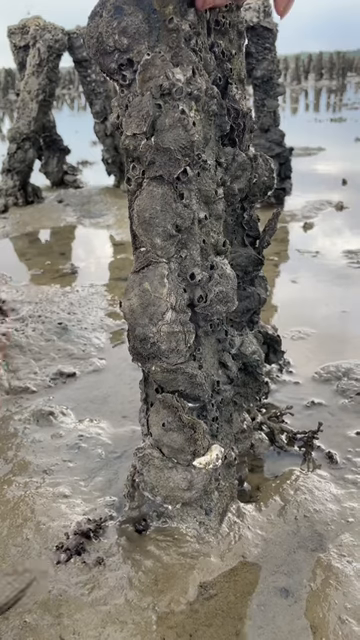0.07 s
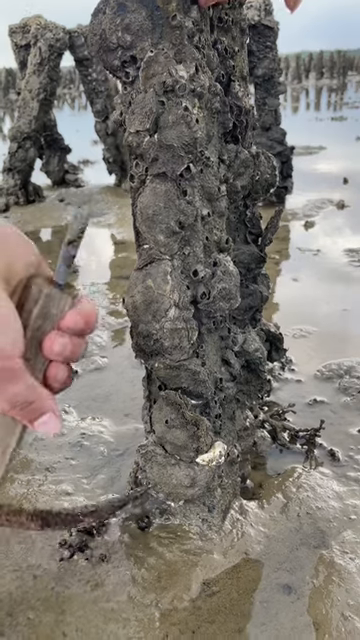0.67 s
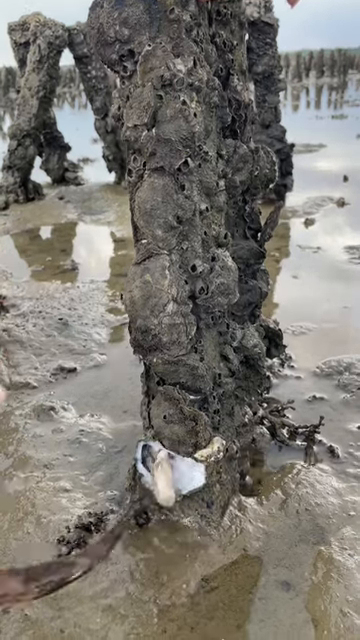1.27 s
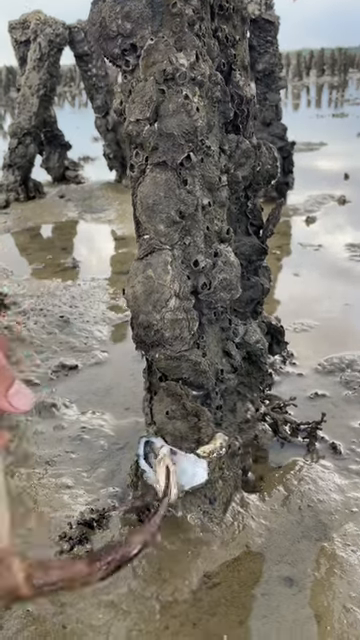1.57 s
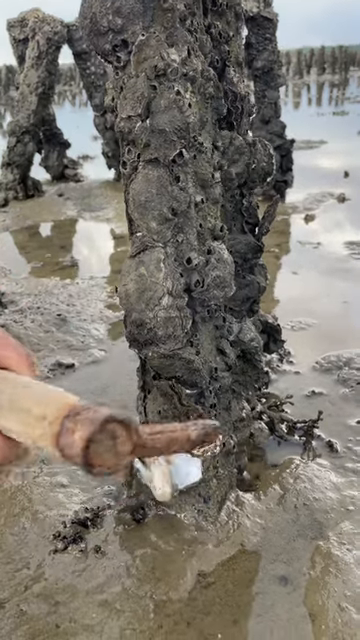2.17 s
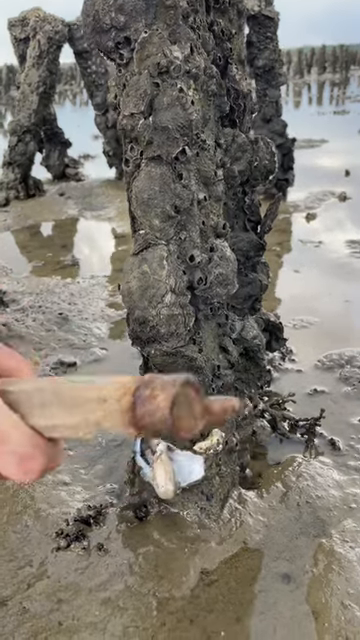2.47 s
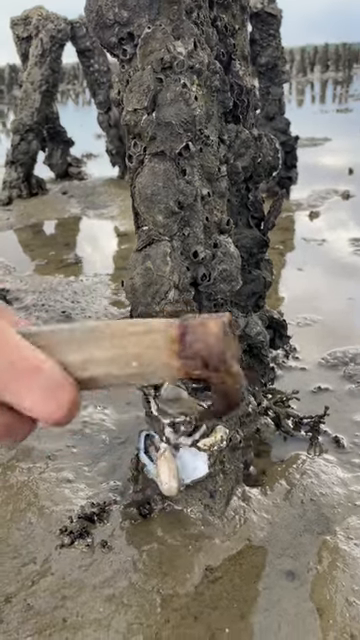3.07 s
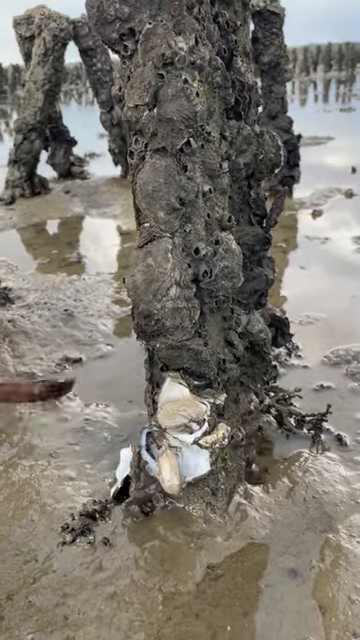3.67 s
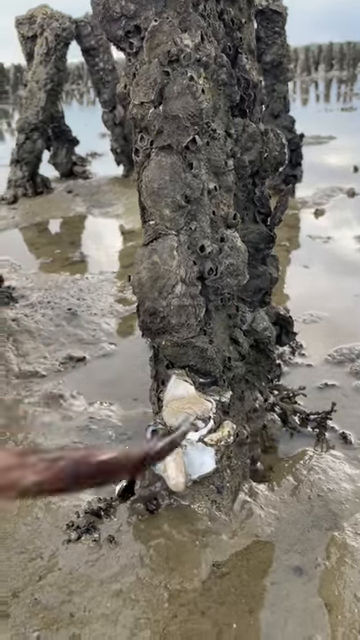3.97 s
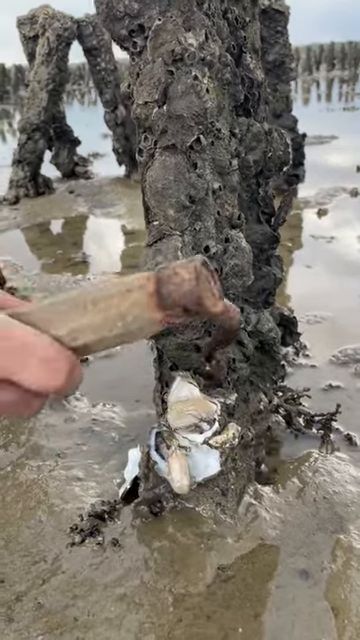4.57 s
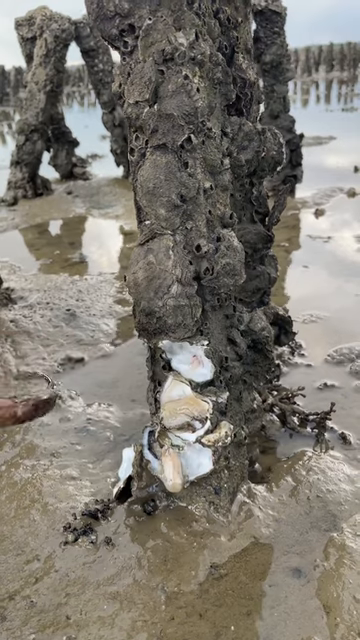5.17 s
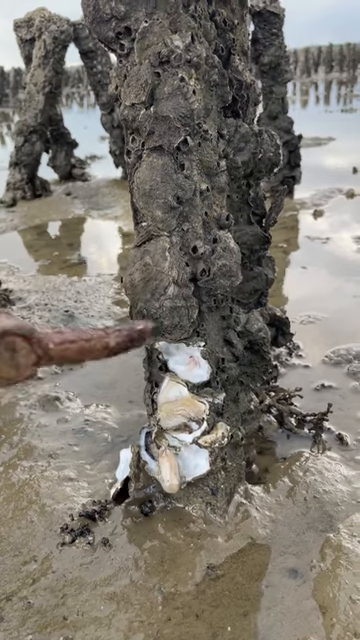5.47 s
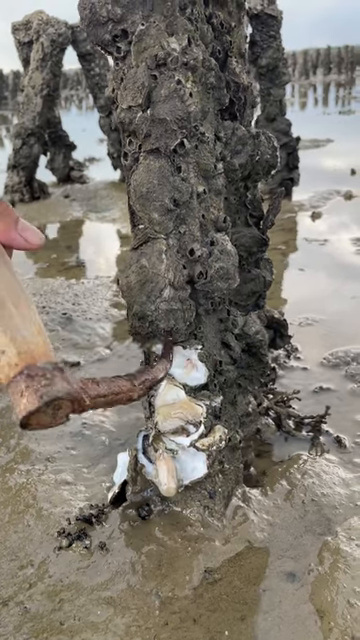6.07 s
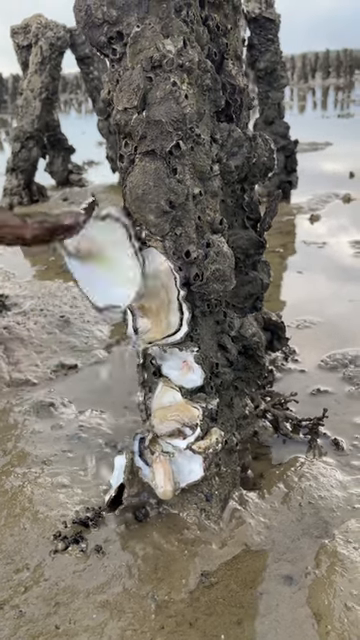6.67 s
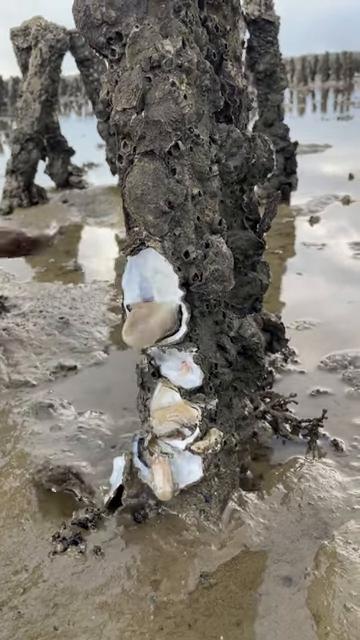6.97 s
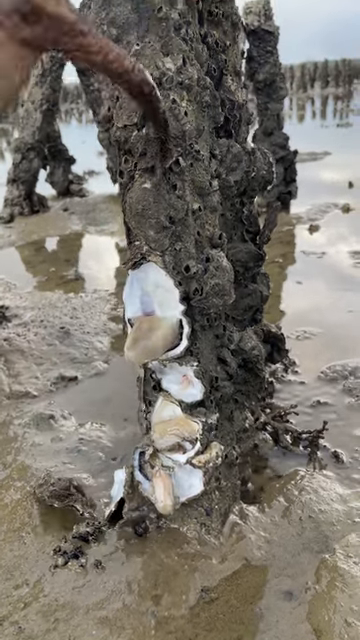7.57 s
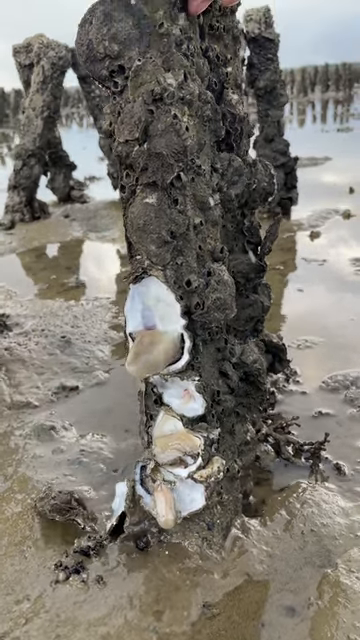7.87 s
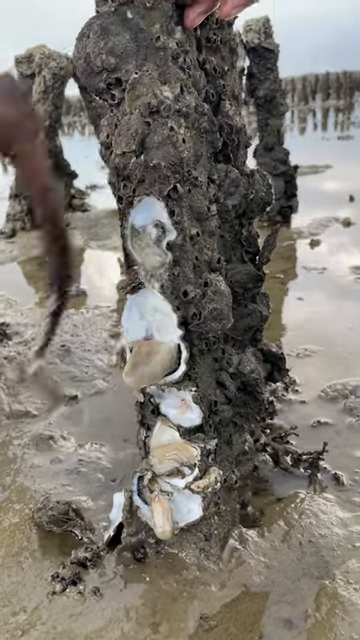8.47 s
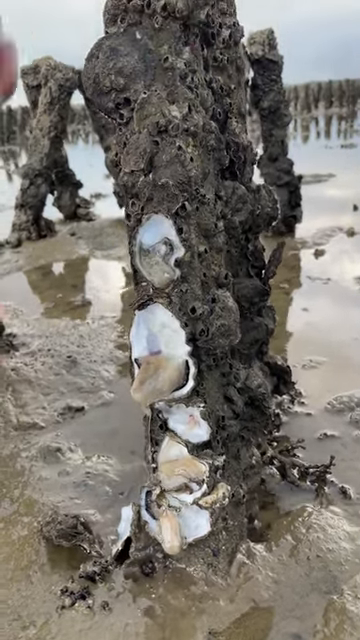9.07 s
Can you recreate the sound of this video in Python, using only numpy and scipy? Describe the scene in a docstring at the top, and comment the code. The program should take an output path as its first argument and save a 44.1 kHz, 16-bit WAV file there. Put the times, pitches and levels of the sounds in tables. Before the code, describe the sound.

Sharp, crunchy blows of a metal pick alternate with squeaky scraping and cracking oyster shell, outdoors in faint low wind.

```python
"""A tidal flat, a stereo microphone close to a post where a steel pick harvests oysters.
Each blow crushes the crust of a shell; the tip then levers and scrapes, sticking and slipping,
the shell cracks, and chips and crumbs fall, a few bits plopping into wet mud. The surrounding posts
scatter a little sound back. A faint wind rumbles throughout, with a few dull thumps,
and a sleeve swishes at the end."""
import sys
import numpy as np
from scipy import signal
from scipy.fft import rfft, irfft, next_fast_len
from scipy.io import wavfile
from scipy.ndimage import uniform_filter1d, map_coordinates

SR = 44100
rng = np.random.default_rng(int(sys.argv[2]) if len(sys.argv) > 2 else 0)


def to_wav(sig):
    """Store sig (one row per channel, or 1-D mono) as 16-bit WAV at the path in sys.argv[1].

    Samples outside -1..1 are clipped; the rate is SR.
    """
    pcm = np.clip(np.atleast_2d(sig), -1, 1) * 32767
    pcm = np.round(pcm).astype(np.int16)
    wavfile.write(sys.argv[1], SR, pcm.T)  # frames by channels


N = 410571


def amp(db):
    return 10 ** (np.asarray(db) / 20)


def unit_rms(x):
    return x / np.sqrt(np.mean(x ** 2, axis=-1, keepdims=True) + 1e-20)


def along(points, hz):
    """Read a curve of (f/Hz, value) points on a log frequency axis."""
    f, v = np.transpose(points)
    return np.interp(np.log(hz + 1), np.log(f + 1), v)


def seconds(length):
    return np.arange(int(length * SR)) / SR


def add(track, s, x):
    """Mix x into the track at time s; the two rows are direct and sideways sound."""
    start = max(round(s * SR), 0)
    part = x[:, :max(N - start, 0)]
    track[:, start:start + part.shape[1]] += part


def filtered(x, response):
    """Shape x by a function of frequency."""
    m = next_fast_len(N + SR // 2)
    return irfft(rfft(x, m) * response(np.fft.rfftfreq(m, 1 / SR)), m)[..., :N]


def minimum_phase(x, gain, tail=1024):
    """Colour x so that its resonances ring only after each impulse."""
    m = 2 * next_fast_len((x.shape[1] + tail) // 2)
    cepstrum = irfft(np.log(np.maximum(gain(np.fft.rfftfreq(m, 1 / SR)), 1e-6)))
    cepstrum[1:m // 2] *= 2
    cepstrum[m // 2 + 1:] = 0
    return irfft(rfft(x, m) * np.exp(rfft(cepstrum)), m)


def burst(x):
    """Give a short sound the energy of 10 ms at rms 1."""
    return x / np.sqrt(np.sum(x ** 2, axis=1, keepdims=True) / (SR / 100))


# gusts over the flat, after a near-silent first instant: t/s, level/dB
GUSTS = [(0, -91), (0.05, -55.5), (0.5, -51.5), (0.7, -49.5), (1.4, -47.5), (1.58, -57.5), (1.7, -42.5),
         (2.5, -50.5), (2.8, -49.5), (3.3, -47.5), (3.8, -52), (4.05, -46), (4.5, -53.5), (5.05, -42),
         (5.4, -55), (6.2, -51.5), (7.6, -50.5), (9.3, -56.5)]
# spectrum of the wind at the microphone: f/Hz, level/dB
WIND_SPECTRUM = [(15, -39), (25, -22.5), (45, -7.5), (70, -5), (110, -11), (200, -17.5), (400, -22.5),
                 (700, -33.5), (1200, -44.5), (2500, -52.5), (5000, -53), (8000, -56), (12000, -58),
                 (16000, -75.5)]


def wind(hiss_db=-56.0, patchy_db=3, flutter_db=1.74, flutter_hz=9):
    """Slow gusts and a quick flutter swell the low rumble; the faint far hiss drifts a little."""
    t = np.arange(N) / SR
    flutter = map_coordinates(rng.standard_normal(size=256), [t * flutter_hz], mode="wrap")
    gust = amp(np.interp(t, *np.transpose(GUSTS)) + flutter_db * flutter)
    spectra = signal.stft(rng.standard_normal((2, N)), nperseg=1024)[2]
    patches = uniform_filter1d(rng.standard_normal(spectra.shape[1:]), size=4, axis=0)
    patches = uniform_filter1d(patches, size=9, axis=1)
    noise = signal.istft(spectra * amp(patchy_db * unit_rms(patches)), nperseg=1024)[1][:, :N]
    air = unit_rms(filtered(noise, lambda hz: amp(along(WIND_SPECTRUM, hz))))
    rumble = filtered(air, lambda hz: 1 / (1 + (hz / 300) ** 4))
    return gust * rumble + amp(hiss_db) * (air - rumble)


def fractures(t, rate, spread_db, dust_db):
    """Tiny breaks of very unequal size, about `rate` a second, over fine grit."""
    breaks = rng.random(len(t)) < rate / SR
    sizes = amp(spread_db * np.clip(rng.standard_normal(len(t)), -2, 2))
    clicks = unit_rms(breaks * sizes * rng.choice([-1, 1], (2, len(t))))
    return unit_rms(clicks + amp(dust_db) * rng.standard_normal((2, len(t))))


# spectrum of oyster shell at close range: f/Hz, level/dB
SHELL_SPECTRUM = [(60, -27), (200, -8.5), (600, -3.5), (1050, 1), (1500, 4), (2600, 7.5), (3500, 5),
                  (5500, 6), (7000, 7), (10000, -3), (13000, -4.5), (15200, -4.5), (16300, -29)]
# resonances of the steel pick: f/Hz, width/Hz, level/dB
PICK_MODES = [(2630, 87, -5.5), (4815, 420, -5), (10600, 590, -2.5)]


def shell(x, knock_db, bright_db, rings, flake_db=6, flake_width=0.039, flake_count=7):
    """Sound through shell and pick: a firm contact knocks more, a sharp one is brighter."""
    # every broken plate has its own size, and so its own modes
    flake_hz = np.geomspace(1750, 13000, flake_count) * np.exp(rng.uniform(-0.24, 0.16, flake_count))
    modes = rings + [(hz, flake_width * hz, flake_db) for hz in flake_hz] + PICK_MODES

    def gain(hz):
        body = amp(along(SHELL_SPECTRUM, hz))
        peaks = 1 + sum(amp(db) ** 2 / (1 + (2 * (hz - f) / width) ** 2) for f, width, db in modes)
        # a strong ring draws its energy from the frequencies around it
        middle = (hz > 1400) & (hz < 7000)
        drawn_db = -10 * np.log10(np.average(peaks[middle], weights=body[middle] ** 2))
        tilt_db = along([(900, knock_db), (1500, drawn_db), (6500, drawn_db), (9000, bright_db - 1)], hz)
        return body * amp(tilt_db) * np.sqrt(peaks)
    return minimum_phase(x, gain)


# hard blows, close: t/s, level/dB, knock/dB, brightness/dB, the shell's low, middle and high ring f/Hz
PICK_BLOWS = [(0.2166, -16, -4.5, 2.5, 648, 3220, 5100), (1.7598, -17, 0, 2.5, 900, 2634, 5450),
              (4.0728, -15.5, -1, 2, 660, 2833, 5790), (5.7675, -15.5, -3.5, -4, 900, 2245, 5830),
              (7.399, -16.5, 7, -0.5, 616, 2380, 5370), (7.9381, -19.5, 6, 3, 548, 2696, 5990)]
# the body of the pick, which only a full blow wakes: f/Hz, width/Hz, level/dB
HAFT_MODES = [(656, 140, 4.5), (919, 130, 1.5), (1410, 130, 4)]


def blows(lead_in_s=0.0095, lead_in_db=-10, crush_s=0.0034, t60=0.019, settle_db=-32, settle_t60=0.17,
          shove_db=27, crossover_hz=1000):
    """The tip shoves the post and crushes the crust for a few ms; the shell rings briefly."""
    out, t = np.zeros((2, N)), seconds(0.17) - lead_in_s
    after = np.maximum(t - crush_s, 0)
    decay = amp(-60 * after / t60) + amp(settle_db - 60 * after / settle_t60)
    # a faint, brief swell leads into each blow
    envelope = np.where(t < 0, amp(lead_in_db + 19 * t / lead_in_s), decay)
    # the thud is one smooth shove; only the treble comes from the crumbling crust
    shove = amp(shove_db) * signal.unit_impulse(len(t), np.searchsorted(t, crush_s / 2))
    thud = np.outer([1, 0], signal.lfilter(*signal.butter(2, crossover_hz, fs=SR), shove))
    for s, db, knock_db, bright_db, low_hz, middle_hz, high_hz in PICK_BLOWS:
        crunch = burst(envelope * fractures(t, rate=6500, spread_db=4.5, dust_db=-5.5))
        crunch = signal.lfilter(*signal.butter(2, crossover_hz, "high", fs=SR), crunch)
        rings = HAFT_MODES + [(low_hz, 170, 6), (middle_hz, 260, 13), (high_hz, 240, 12.5)]
        add(out, s - lead_in_s, amp(db) * shell(thud + crunch, knock_db, bright_db, rings, flake_db=4.0))
    return out


# the tip scraping and levering, close: start t/s, end t/s, level/dB, rise/dB, ring f/Hz, squeal/dB
SCRAPES = [(0.235, 0.288, -50.5, 0.5, 3380, 12), (0.446, 0.52, -57, -11.5, 3040, 6.5),
           (0.605, 0.65, -47, 0, 5370, 9), (0.728, 0.756, -26, 5.5, 1470, 25.5),
           (0.755, 0.785, -27, 1, 5740, 8.5), (1.94, 2.006, -52.5, 0.5, 5700, 9.5),
           (2.17, 2.227, -62.5, -8, 2430, -3), (2.297, 2.339, -52, -3, 6960, 11),
           (2.356, 2.419, -57.5, 3.5, 2630, 28), (2.537, 2.585, -33, 3.5, 2520, 12),
           (2.629, 2.788, -56, 2, 6800, 3.5), (2.789, 2.871, -28.5, 2, 3130, 20),
           (2.894, 2.923, -28, 1, 2744, 31), (2.994, 2.996, -34, -7, 2790, 35),
           (3.031, 3.09, -34.5, 7, 2910, 22), (3.15, 3.175, -32, 6, 2140, 27),
           (3.174, 3.221, -40.5, -9, 2740, 15.5), (4.183, 4.264, -44, 0, 5240, 9.5),
           (4.29, 4.388, -50.5, -5, 5700, 0.5), (4.678, 4.79, -30, 1.5, 2400, 5),
           (4.926, 4.992, -55, -1, 2720, 8), (5.885, 6.028, -57, -4.5, 6800, 6),
           (6.06, 6.091, -46.5, 11, 6650, 2), (6.11, 6.154, -46, 7.5, 1740, 19.5),
           (6.315, 6.439, -34, -7.5, 2140, 10.5), (6.446, 6.557, -53.5, 1.5, 5750, 7.5),
           (6.82, 6.908, -59, -6, 3400, 6), (8.157, 8.397, -53.5, 31.5, 4460, 8),
           (8.405, 8.459, -38.5, -17, 3700, 14), (8.494, 8.521, -46, 9, 5560, 13),
           (8.705, 8.732, -50, 1, 1450, 4)]


def scrapes(edge_s=0.009, lean_db=3.5, slip_rate=140, slip_db=4.0, break_rate=2600, full_db=-28,
            thinning=0.23, plates=3):
    """The tip sticks and slips over layered shell; each slip sheds fractures and rings one plate."""
    out = np.zeros((2, N))
    for start, end, db, rise_db, ring_hz, squeal_db in SCRAPES:
        length = end - start
        t = seconds(length + 4 * edge_s) - 2 * edge_s
        travel = np.clip(t / length, 0, 1) - 0.5
        pressure = amp(-15 * (np.maximum(-t, 0) + np.maximum(t - length, 0)) / edge_s)
        # the hand leans in or lets go, easing at both ends
        pressure *= amp(rise_db * travel - lean_db * (2 * travel) ** 2)
        slip_index = np.cumsum(rng.random(len(t)) < slip_rate / SR)
        slip_age = t - t[np.searchsorted(slip_index, slip_index)]
        slip_size = amp(slip_db * np.clip(rng.standard_normal(len(t)), -1.6, 1.6)[slip_index])
        release = slip_size * (1 + np.exp(-slip_age / 0.002))
        rate = break_rate * amp(thinning * (db - full_db))  # a light touch breaks fewer flakes
        grit = pressure * unit_rms(release * fractures(t, rate, spread_db=2.5, dust_db=-8.5))
        # a grinding tip knocks and hisses; the more it squeals, the more of both it loses
        knock_db, bright_db = 9 - 0.92 * squeal_db, 3.5 - 0.45 * squeal_db
        for plate in range(plates):  # successive slips catch on different plates
            plate_hz = ring_hz * np.exp(0.055 * rng.standard_normal())
            caught = grit * (slip_index % plates == plate)
            sound = shell(caught, knock_db, bright_db, [(plate_hz, 215, squeal_db)], flake_db=7.5)
            add(out, start - 2 * edge_s, amp(db) * sound)
    return out


# the shell cracking under the tip, close: t/s, level/dB, knock/dB, brightness/dB, ring f/Hz
SHELL_CRACKS = [(0.28, -45.5, -7, -3.5, 3480), (0.6203, -42, 3.5, -11, 5100),
                (0.6993, -39.5, -0.5, -10, 1580), (0.7112, -34, -16, 0, 1750),
                (0.7356, -25.5, -13, -5.5, 1580), (0.7479, -28, -10, -4, 1482),
                (0.7789, -29, -5.5, -7.5, 5620), (0.9294, -52, -18.5, 17, 6750),
                (1.4827, -50, -4, -9, 1910), (2.1105, -54, 3, 0, 6660), (2.3153, -49.5, 4, 13, 6900),
                (2.3955, -52, 6, -7, 2660), (2.559, -28, -2, -3, 2560), (2.7108, -36.5, 1, 2, 1980),
                (2.723, -34.5, 10, 13, 6670), (2.8131, -34.5, 7, 4, 3130), (2.8374, -31.5, 5, 0.5, 2980),
                (3.2116, -40.5, -13.5, 0, 1940), (3.4984, -59, 5.5, -6, 2680),
                (4.1203, -48.5, -3.5, -4, 5480), (4.2538, -38, -19, -6, 4660), (4.3209, -34, -3, 5.5, 5530),
                (4.3604, -38.5, 5.5, 0, 5770), (4.467, -33.5, 10, 5.5, 3920), (4.5578, -36.5, 5, 3.5, 4370),
                (4.5968, -47.5, 14.5, 2, 4640), (4.6875, -29, 7.5, 1, 5700), (4.724, -31.5, -9, 6, 2050),
                (4.7841, -25, -26, 5.5, 4980), (4.939, -31.5, -15, 2, 2820), (4.9745, -53.5, -2, 5, 5960),
                (5.1805, -78.5, -3.5, 25.5, 6360), (5.8381, -38, -21.5, 2.5, 6360),
                (5.9296, -39.5, -23, 3.5, 6270), (6.0816, -43, 5, 10, 6640), (6.215, -44.5, -3, 1.5, 2760),
                (6.2698, -37.5, -10, 3, 4740), (6.3308, -28.5, -9, 4, 1640), (6.6365, -43.5, 0.5, -7, 5940),
                (6.8094, -37.5, -13.5, 6, 7010), (6.8352, -51, 3, 13, 3280), (6.9582, -70.5, -3, 18, 6890),
                (7.7352, -43, -3.5, 0, 7040), (8.1387, -42, -1, 6.5, 4340), (8.3216, -34, -5, 8, 4300),
                (8.356, -35, -6, 7.5, 4210), (8.3994, -18, -8.5, -1.5, 4070),
                (8.5129, -40, -24.5, -1.5, 5390), (8.6349, -39.5, 5, 9, 6360)]


def cracks(rise_s=0.004, rise_db=-15, t60=0.014, settle_db=-26, settle_t60=0.1):
    """A faint, short rise, then a snap in a quickly dying shower of fractures."""
    out, t = np.zeros((2, N)), seconds(0.09) - rise_s
    decay = amp(-60 * t / t60) + amp(settle_db - 60 * t / settle_t60)
    envelope = np.where(t < 0, amp(rise_db + 14 * t / rise_s), decay)
    for s, db, knock_db, bright_db, ring_hz in SHELL_CRACKS + chips():
        snap = burst(envelope * fractures(t, rate=3400, spread_db=4, dust_db=-8.0))
        sound = shell(snap, knock_db, bright_db, [(ring_hz, 220, 13)], flake_db=4.5)
        add(out, s - rise_s, amp(db) * sound)
    return out


def crumbs(rate=110, crumb_db=-50, t60=0.51):
    """Wet crumbs trickle down after every scrape, louder after a hard one."""
    out, t, flake_t = np.zeros((2, N)), seconds(0.4), seconds(0.01)
    for _, end, db, *_ in SCRAPES:
        ticks = fractures(t, rate, spread_db=6.5, dust_db=-6.5) * amp(-60 * t / t60)
        flake = rng.standard_normal((2, len(flake_t))) * amp(-60 * flake_t / 0.019)
        trickle = signal.fftconvolve(ticks, flake / np.linalg.norm(flake[0]), axes=1)
        add(out, end, amp(crumb_db + 0.4 * db) * shell(trickle, knock_db=-1, bright_db=2.8, rings=[]))
    return out


def chips(wait_s=0.06, chip_db=-67, spread_db=3, knock_db=0, bright_db=9, ring_hz=4500):
    """Each scrape loosens a chip that snaps off a moment later: rows of faint, bright cracks."""
    chance = rng.standard_normal((len(SCRAPES), 4))
    return [(end + wait_s * np.exp(0.5 * late), chip_db + spread_db * loud,
             knock_db, bright_db + 5 * sharp, ring_hz * np.exp(0.25 * small))
            for (_, end, *_), (late, loud, sharp, small) in zip(SCRAPES, chance)]


# dull thumps under the work: t/s, level/dB
DULL_THUMPS = [(0.655, -29), (1.272, -34), (1.393, -24.5), (1.437, -26.5), (1.47, -31.5), (1.664, -33.5),
               (1.864, -29.5), (1.992, -29), (3.189, -35), (4.804, -31), (4.941, -29), (5.042, -28.5),
               (6.213, -29.5), (6.505, -36), (7.225, -41.5), (7.567, -34)]


def thumps(start_hz=175, end_hz=62, glide_s=0.018, attack_s=0.0088, t60=0.17):
    """Soft low pushes that sink in pitch as they die, blurred by a dull rustle."""
    out, t = np.zeros((2, N)), seconds(0.18)
    glide_hz = end_hz + (start_hz - end_hz) * np.exp(-t / glide_s)
    low_band = signal.butter(2, [50, 260], "band", fs=SR, output="sos")
    for s, db in DULL_THUMPS:
        hz = glide_hz * np.exp(0.23 * rng.standard_normal())
        rustle = unit_rms(signal.sosfilt(low_band, rng.standard_normal((2, len(t)))))
        push = np.outer([1, 0], np.sin(2 * np.pi * np.cumsum(hz) / SR)) + 0.19 * rustle
        add(out, s, push * (1 - np.exp(-t / attack_s)) * amp(db - 60 * t / t60))
    return out


# bits dropping into the wet mud: t/s, level/dB, f/Hz
MUD_PLOPS = [(4.166, -43, 740), (8.671, -41, 1230), (8.726, -36.5, 1070), (8.741, -50, 3630)]


def plops(sink=0.2, glide_s=0.0031, attack_s=0.00026, t60=0.025):
    """A small pocket of wet mud rings and sinks in pitch."""
    out, t = np.zeros((2, N)), seconds(0.06)
    for s, db, hz in MUD_PLOPS:
        pitch = hz * (1 + sink * (2 * np.exp(-t / glide_s) - 1))
        envelope = (1 - np.exp(-t / attack_s)) * amp(db - 60 * t / t60)
        add(out, s, np.outer([1, 0], envelope * np.sin(2 * np.pi * np.cumsum(pitch) / SR)))
    return out


# sleeve swishes near the microphone: t/s, half length/s, level/dB
SLEEVE_SWISHES = [(7.579, 0.051, -70), (8.972, 0.081, -62.5), (9.209, 0.065, -64)]
# spectrum of sliding cloth: f/Hz, level/dB
CLOTH_SPECTRUM = [(200, -18), (1000, -0.5), (2600, 2), (4000, -3), (5500, 5.5), (8000, -3), (11000, 4.5),
                  (14000, -15), (16000, -17.5)]


def sleeve():
    """Cloth slides softly as the arm moves."""
    t = np.arange(N) / SR
    level = sum(amp(db) * np.exp(-((t - s) / half) ** 2) for s, half, db in SLEEVE_SWISHES)
    return level * filtered(rng.standard_normal((2, N)), lambda hz: amp(along(CLOTH_SPECTRUM, hz)))


# decay of the scatter from the surrounding posts: f/Hz, t60/s
POST_DECAY = [(300, .3), (2500, 0.2), (6000, 0.2), (12000, 0.03)]


def post_scatter(x):
    """The other posts send a thin, short scatter back to the microphone."""
    hz, t, spectra = signal.stft(rng.standard_normal((2, SR // 2)), SR, nperseg=256)
    tail = signal.istft(spectra * amp(-60 * t / along(POST_DECAY, hz)[:, None]), SR, nperseg=256)[1]
    echo = signal.fftconvolve(x, tail / np.linalg.norm(tail[0]), axes=1)[:, :N]
    colour = [(500, -27), (1400, -23), (2500, -31.5), (4000, -28), (6000, -33.5), (9000, -41.5)]
    return filtered(echo, lambda hz: amp(along(colour, hz)))


# how alike the microphone's two ports sound: f/Hz, likeness/0-1
PORT_LIKENESS = [(100, .93), (350, 0.35), (800, 0.13), (1700, 0.21), (2600, 0.95), (3200, .3), (4400, 0.34),
                 (5200, 1), (6300, .88), (7800, 1), (9400, 0.6), (11000, 0.97), (13500, 0.87), (16000, .9)]
# phase by which the left port leads: f/Hz, lead/rad
LEFT_LEAD = [(2600, 0), (4300, 1.1), (5100, 0), (6000, 1.1), (7100, 2.9), (8600, 3.3), (9900, 6.1),
             (11600, 6.4), (13600, 9.3), (16000, 9.6)]


def microphone(x):
    """Direct and sideways sound reach two ports; the housing delays the treble on the right."""
    def pickup(hz):
        angle = np.arccos(np.clip(along(PORT_LIKENESS, hz), 0, 0.98)) / 2
        return np.array([np.cos(angle), np.sin(angle)])
    direct, sideways = filtered(x, pickup)
    left_right = np.array([direct + sideways, direct - sideways])
    return filtered(left_right, lambda hz: np.exp(0.5j * np.outer([1, -1], along(LEFT_LEAD, hz))))


def scene():
    """The work at the post, close up, over a rumble that leans to the right."""
    work = blows() + cracks() + scrapes() + crumbs() + plops()
    near = microphone(work + post_scatter(work) + sleeve())
    return near + amp([[-0.9], [0.9]]) * microphone(wind() + thumps())


def record(dry, ceiling=0.88, top_hz=16800):
    """The hardest peaks are rounded off; nothing is kept above the band limit."""
    rounded = dry / (1 + np.abs(dry / ceiling) ** 6) ** (1 / 6)
    return filtered(rounded, lambda hz: np.clip((top_hz - hz) / 700, 0, 1) ** 2)


dry = scene()
out = record(dry)
to_wav(out)
```